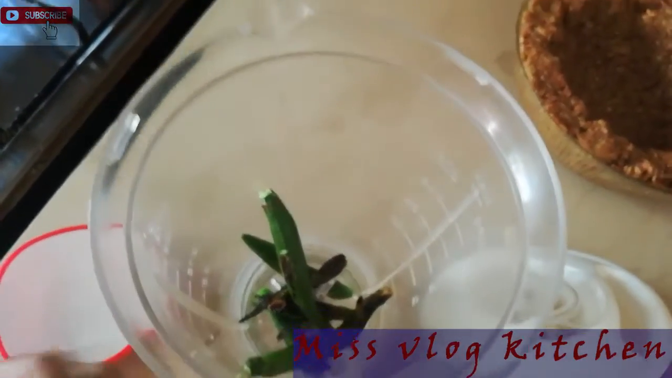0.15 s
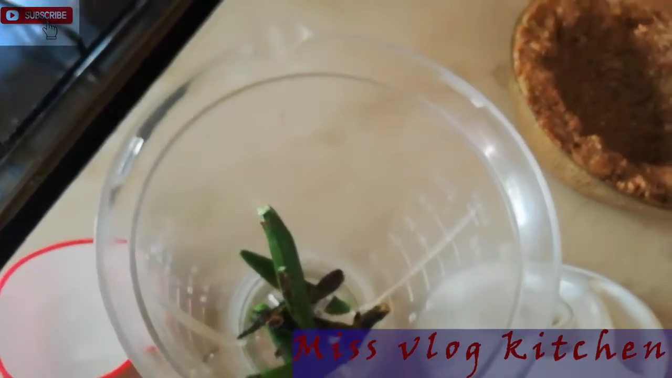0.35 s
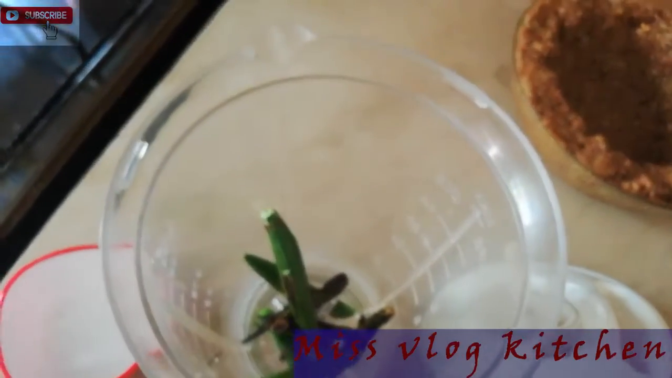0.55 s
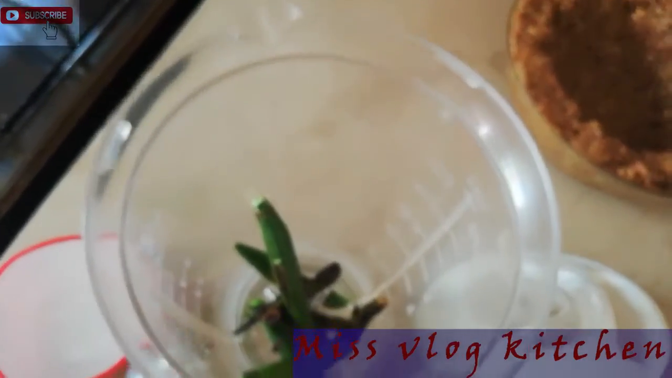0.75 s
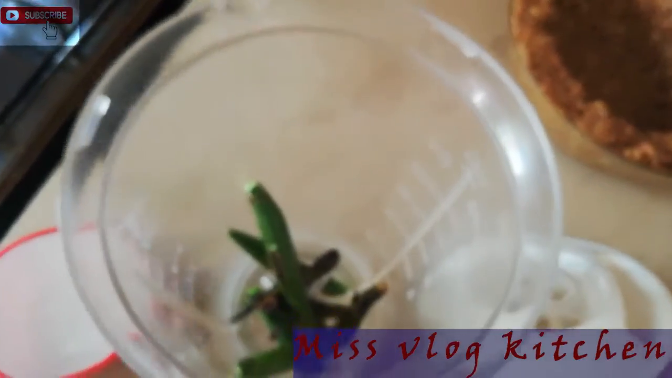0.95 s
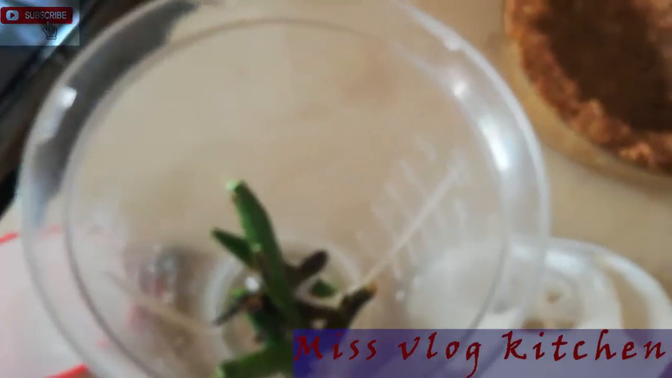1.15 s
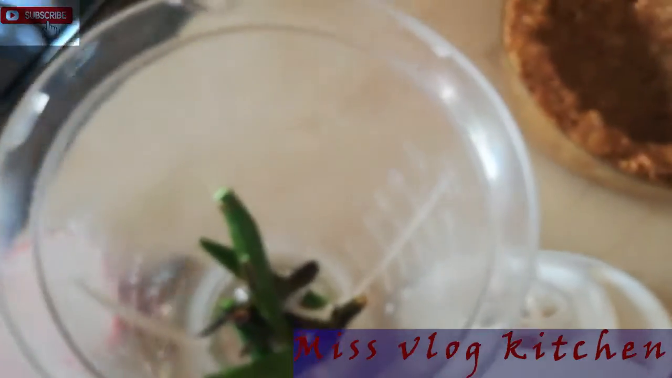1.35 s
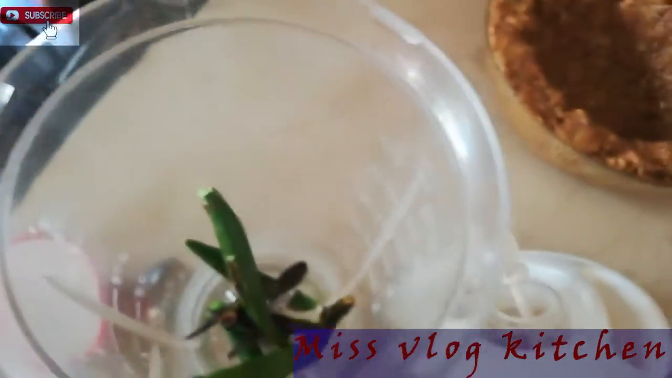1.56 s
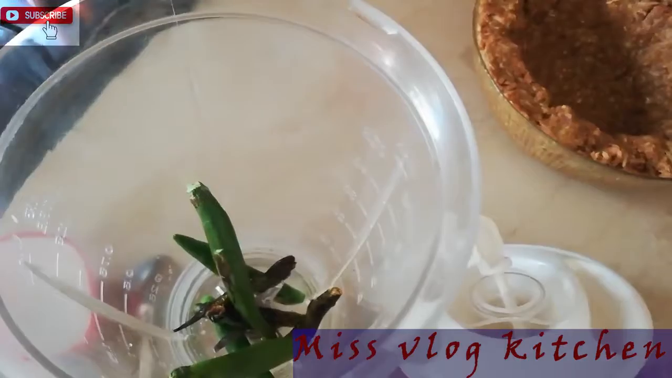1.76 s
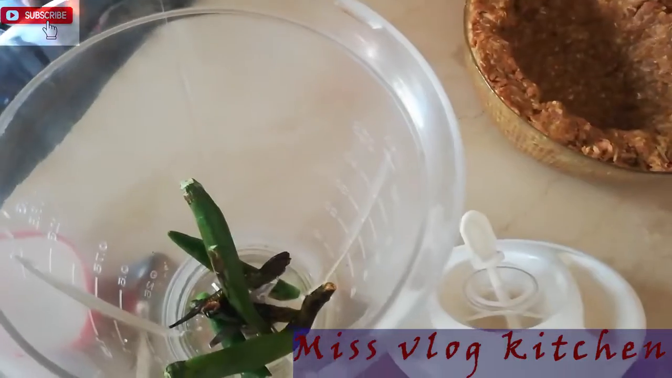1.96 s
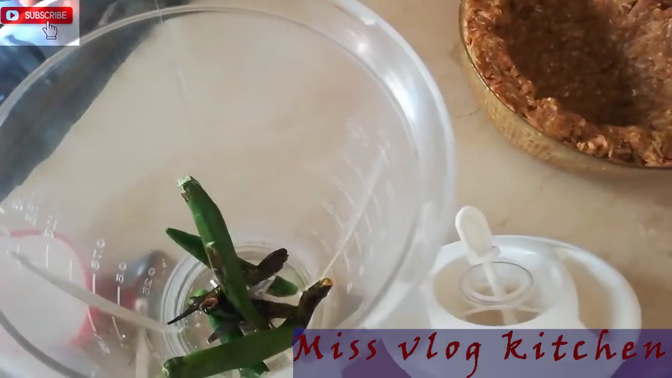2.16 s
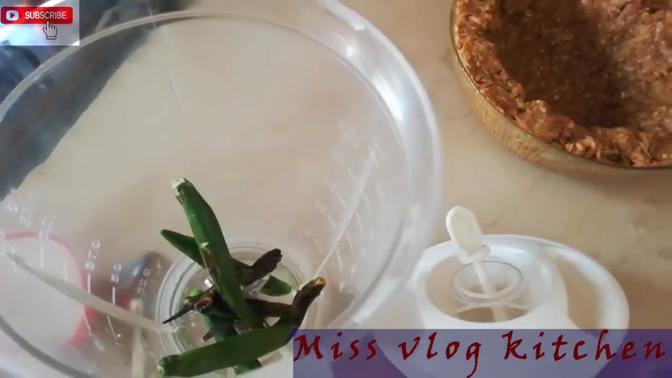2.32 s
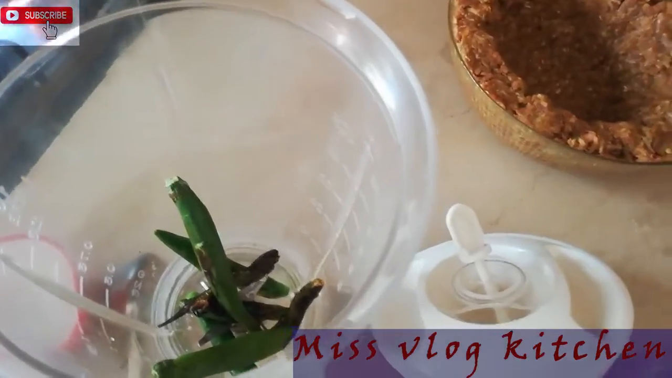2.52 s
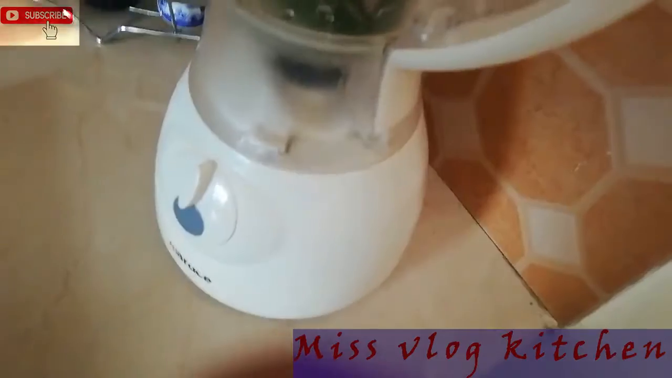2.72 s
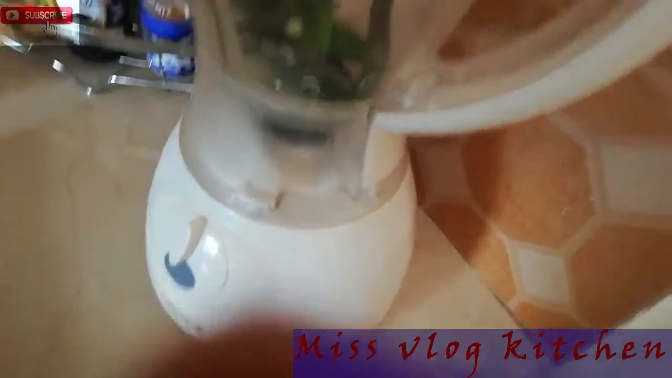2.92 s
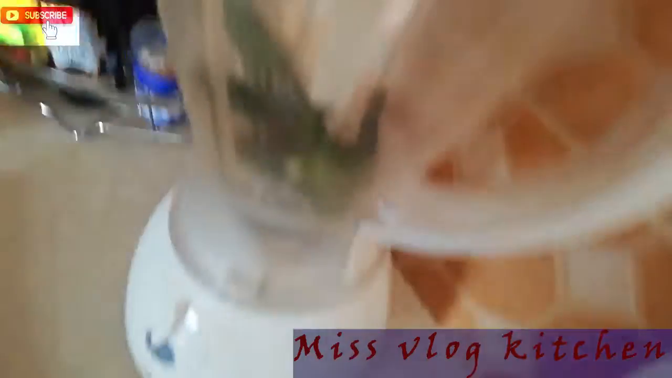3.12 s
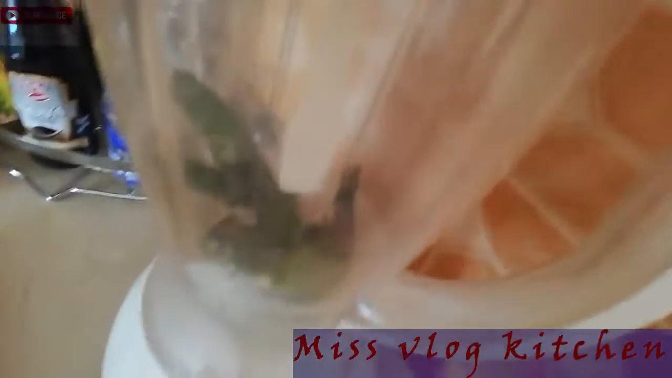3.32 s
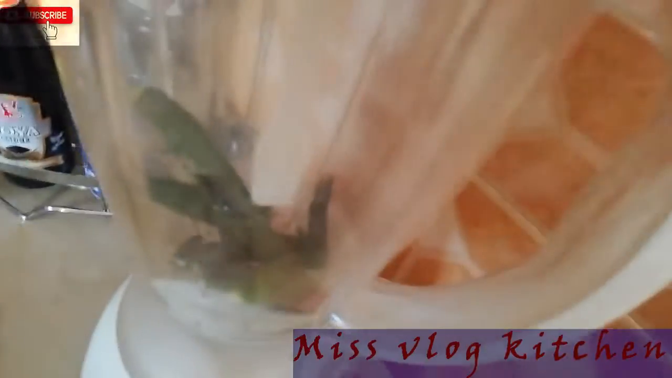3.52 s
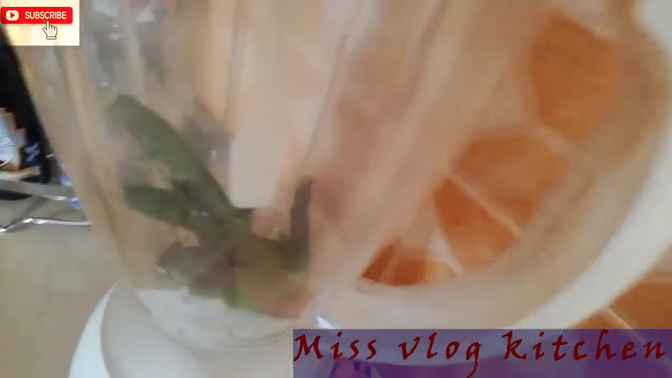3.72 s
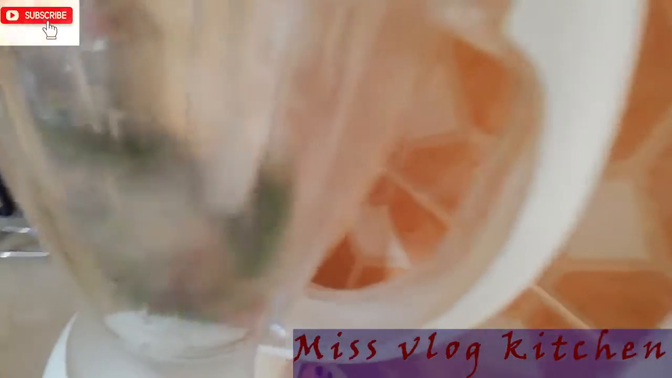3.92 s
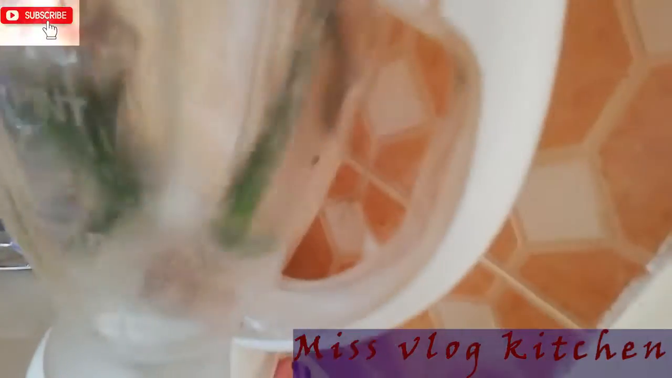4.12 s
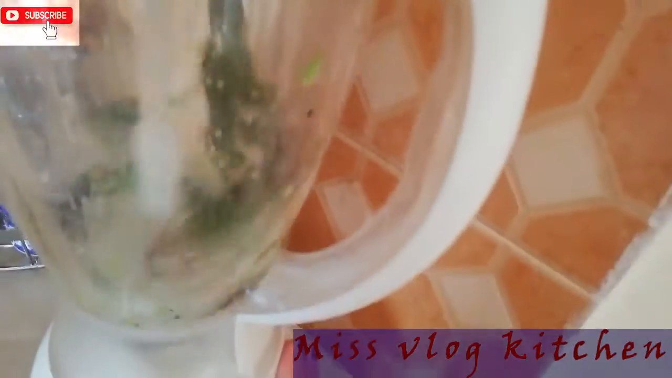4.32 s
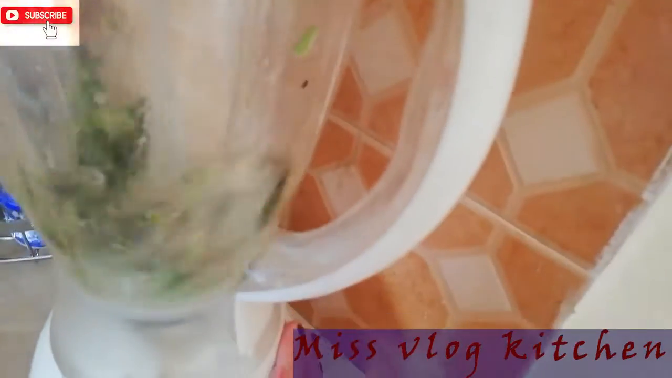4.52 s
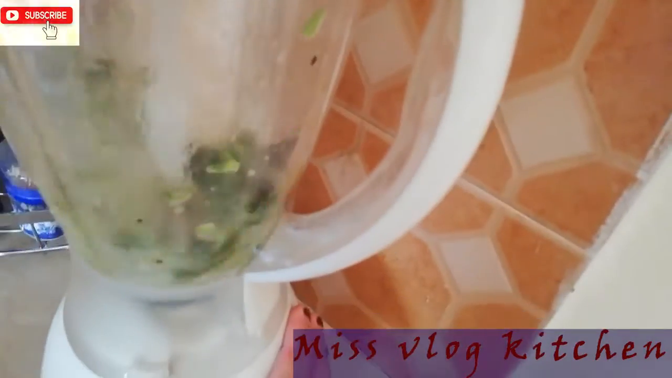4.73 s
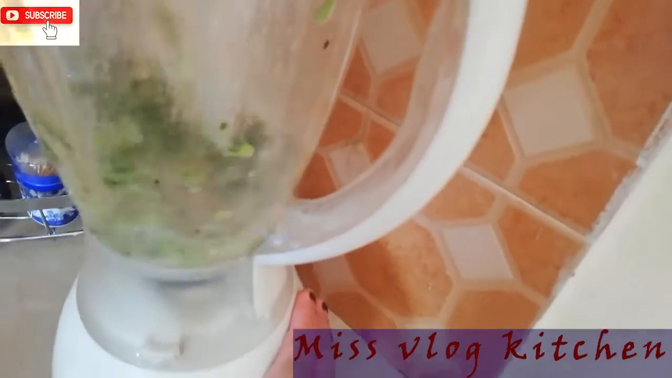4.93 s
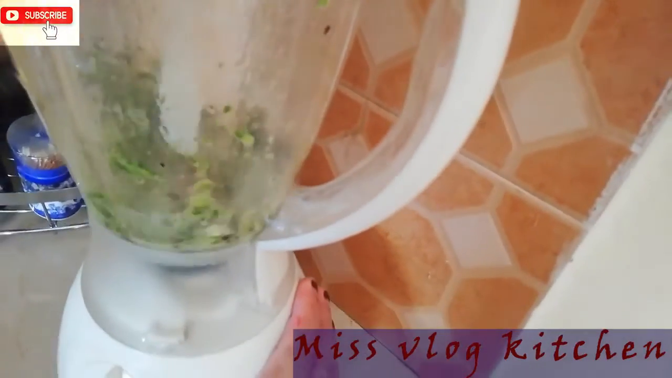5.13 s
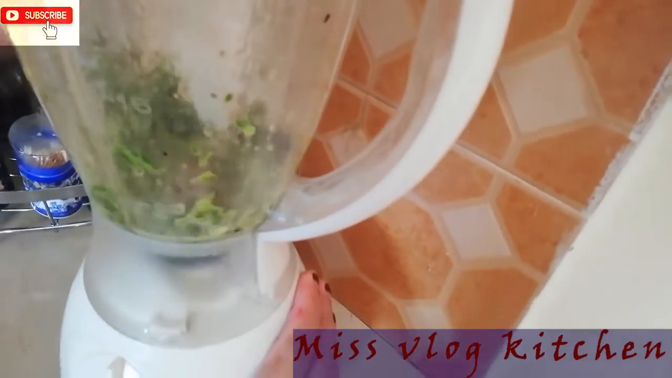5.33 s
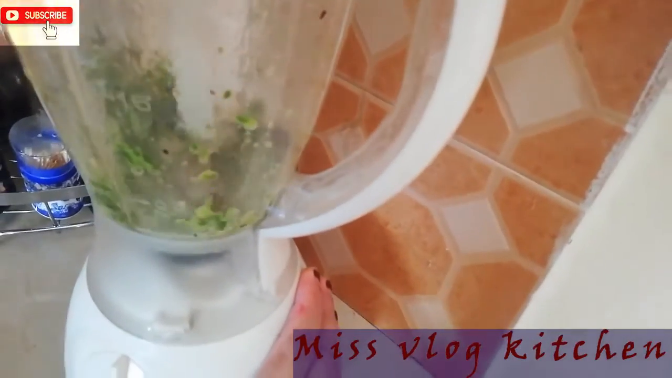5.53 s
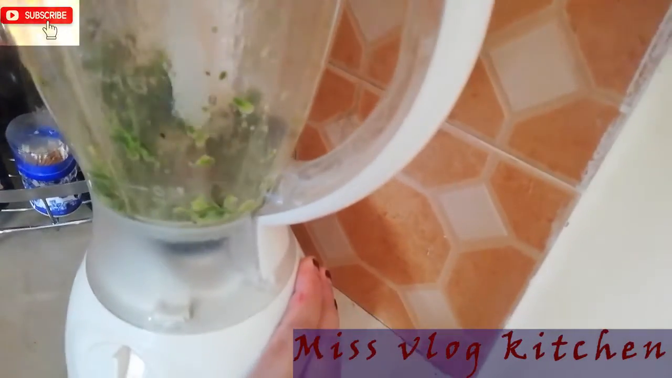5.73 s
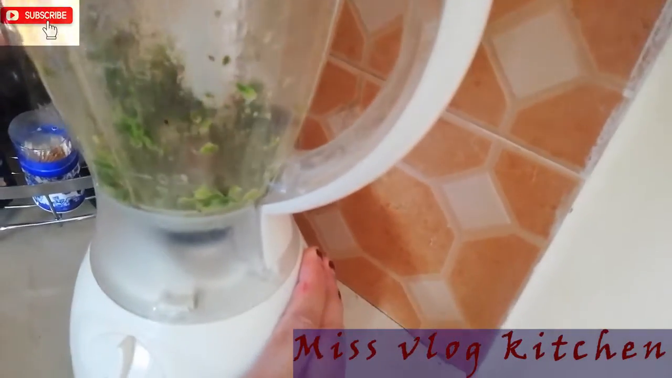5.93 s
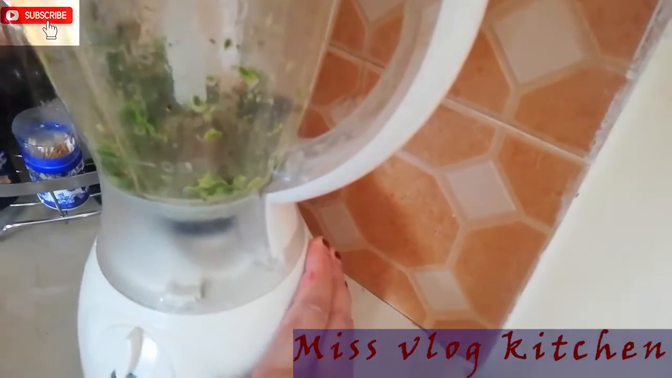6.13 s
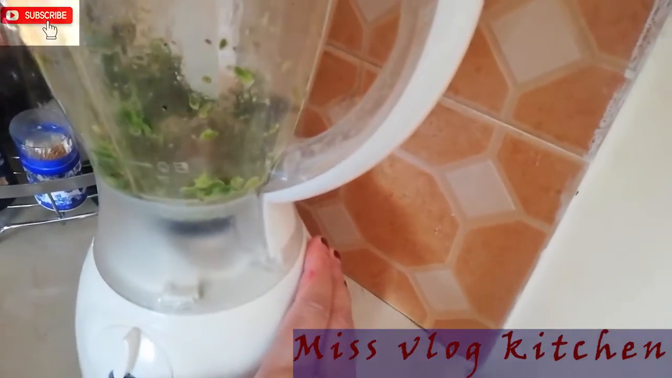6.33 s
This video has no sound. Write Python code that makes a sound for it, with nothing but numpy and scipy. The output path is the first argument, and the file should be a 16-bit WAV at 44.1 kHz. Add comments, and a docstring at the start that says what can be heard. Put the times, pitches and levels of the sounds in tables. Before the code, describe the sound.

Hands scuff a plastic jug and a small steel part taps and rattles, then a blender roars on, chopping lumpily before whining down.

```python
"""A blender starts close to the two ports of a phone, chops a few chillies in lumps, speeds up as they
clear and is switched off: shaft tones and whine, noise grains ringing the jug, and fan hiss.
Before it a knock dies away, hands scuff plastic and cloth (friction grains), and a small steel part is
tapped and slides rattling (decaying sines). Behind lies a quiet kitchen: shaped noise and mains hum."""
import sys
import numpy as np
from scipy import signal
from scipy.fft import rfft, irfft
from scipy.io import wavfile
from scipy.ndimage import uniform_filter1d

SR = 44100
rng = np.random.default_rng(int(sys.argv[2]) if len(sys.argv) > 2 else 0)


def boost(x):
    """Linear amplitude factor 10**(x/20) for a level x in decibels (scalar or array-like)."""
    u = np.asarray(x, float) / 20
    return 10 ** u


def master_out(mix):
    """Clip the mix to full scale and print it as 16-bit PCM to the path in sys.argv[1]."""
    frames = np.transpose(np.atleast_2d(mix))
    ceiling = np.clip(frames, -1, 1)
    pcm = np.round(ceiling * 32767).astype(np.int16)
    wavfile.write(sys.argv[1], SR, pcm)


N = 280917
T = np.arange(N) / SR  # s

# Levels in the tables are relative; the gains applied later set the final loudness.
POWER_ON = 3.92  # s
HUM_HZ = 100  # mains hum, in the room and in the motor windings


def blender():
    """The clean tones of the motor, and the noise of the jug that it drives."""
    turns, tones = motor()
    return tones, chopping(turns)


def shaft():
    """Load of big pieces 0-1, speed share while coasting, tone change in dB, share without current, gate."""
    power_off, mince_s, coast_s = 6.05, 0.47, 0.77  # s; the last two are time constants
    shake_db, free_db = -31, 4.5  # shaft tone change at full load, and once the current is off
    since_on, since_off = np.maximum(T - POWER_ON, 0), np.maximum(T - power_off, 0)
    load = np.exp(-since_on / mince_s)
    coast = np.exp(-since_off / coast_s)
    free = 1 - np.exp(-since_off / .05)
    on = np.clip((T - POWER_ON) / 0.0014, 0, 1)
    return load, coast, shake_db * load + free_db * free, free, on


def motor():
    """Shaft tone and orders, hum of the windings, commutator whine and a last squeak."""
    # motor under power, before coasting: time_s, shaft_turns_per_s, shaft_tone_db
    speeds = [(3.92, 120, -61), (4.15, 165, -46), (4.3, 200, -49), (4.41, 203, -32), (5.0, 208, -31),
              (5.1, 210, -30.5), (5.3, 215.5, -29), (5.8, 225, -30), (6.05, 226.5, -30)]
    # orders of the shaft: multiple, level_db
    order_levels = [(2, -12), (3, -7), (4, 0), (5, -3), (6, -2), (7, -9), (8, -7), (9, -7), (10, -8)]
    # commutator whine: multiple, level_db, width_hz
    bars = [(36, -38, 70), (48, -38, 50), (60, -49, 60)]
    # squeak as the shaft slows: start_s, end_s, pitch_hz, width_hz, level_db
    squeak = (6.23, 6.32, 3520, 60, -36)
    tone_power = 3.3  # shaft tone follows the coasting speed to this power
    winding_db, winding_load_db = -40, -21  # hum of the windings, and its change at full load

    load, coast, clear_db, free, on = shaft()
    hz, tone_db, _ = curve(speeds)
    hz = hz * coast
    wobble = evened(uniform_filter1d(rng.standard_normal(N), size=900))
    turns = np.cumsum(hz * (1 + .0015 * wobble)) / SR
    orders = np.zeros(N)
    for k, db in order_levels:
        housing_db = np.minimum(24 * np.log2(k * hz / 870), 0)  # radiates poorly under 870 Hz
        orders += boost(db + housing_db) * np.sin(2 * np.pi * (k * turns + rng.random()))
    tones = boost(tone_db) * coast ** tone_power * np.sin(2 * np.pi * turns)
    tones = tones + boost(clear_db - 35 + 2.5 * wobble) * orders
    whine = np.zeros(N)
    for k, db, width in bars:
        whine += boost(db + 2 * clear_db) * evened(resonate(rng.standard_normal(N), k * hz, width))
    winding = boost(winding_db + winding_load_db * load) * np.sin(2 * np.pi * HUM_HZ * T)
    powered = (1 - free) * (whine + winding)  # no current, no whine
    return turns, on * (tones + powered) + note(*squeak)


def chopping(turns):
    """Blade strikes ring the jug, pieces hit its wall, and the fan hisses; strikes and fan throb each turn."""
    # pieces jam the blades, then clear: peak_s, build_up_s, clearing_s, gain_db
    jams = [(3.929, 0.018, 0.023, 3.5), (4.039, 0.12, 0.016, 4.5), (4.17, 0.14, 0.037, 5),
            (4.234, 0.054, 0.015, 8.5), (4.38, 0.084, 0.013, 4), (4.46, 0.019, 0.017, 5),
            (4.511, 0.039, 0.029, 5), (4.59, .05, 0.091, 3.5), (4.685, 0.049, .025, 5.5),
            (4.765, 0.056, 0.018, 6), (4.835, 0.031, 0.11, 4), (5.021, 0.041, 0.058, 4.5),
            (5.43, 0.049, .02, 2.5)]
    # resonances of the jug: pitch_hz, width_hz, level_db
    jug_modes = [(905, 55, -9), (1007, 28, -8), (1565, 28, -2), (2020, 45, -2), (2130, 70, 0),
                 (2620, 45, -9), (2890, 140, -5), (3290, 140, -7), (3850, 140, -5), (4700, 100, -10)]
    # broad chopping roar: frequency_hz, level_db
    roar = [(150, -9.5), (250, -20), (287, -19.5), (606, -9), (695, -14), (913, -4.5), (1430, -8),
            (2070, -0.5), (2400, -6.5), (2910, -7), (6500, -18.5), (8450, -26), (14300, -120)]
    # fan hiss: frequency_hz, level_db
    fan_colour = [(2350, -60), (4000, -5), (5810, -2), (6450, -4.5), (7030, -4), (8020, 0.5), (8740, 0.5),
                  (10600, -3), (13000, -9.5), (15800, -22.5)]
    # pieces flung against the jug wall: start_s, level_db, t60_s
    chunks = [(3.979, -7, 0.092), (4.022, -24, 0.13), (4.1265, -5.5, 0.46), (4.2224, -20, 0.21),
              (4.4363, -4, 0.28), (4.4934, -11.5, 0.2), (4.5796, -10, 0.14), (4.67, -2.5, 0.14),
              (4.7499, -6, 0.11), (4.8232, -5.5, 0.15), (5.3995, -13, 0.21)]
    # jug wall under the flung pieces: frequency_hz, level_db
    wall = [(1500, -35), (2800, -8), (3250, -2), (3550, 2), (3850, 8), (4300, -1), (4800, 5.5), (6000, -4),
            (15000, -22)]
    chop_db, chop_load_db, fan_db, fan_load_db = -21.5, -3.5, -27.5, -8  # levels, changes at full load
    ring_empty_db, ring_load_db = -10, 10  # the jug rings more while big pieces are in it
    chop_power, fan_power = 0.66, 0.41  # levels follow the coasting speed to these powers

    load, coast, _, _, on = shaft()
    heavy = np.sqrt(load)
    jam_db = np.zeros(N)
    for s, rise, clearing, db in jams:
        jam_db += db * np.clip(np.minimum(1 + (T - s) / rise, 1 - (T - s) / clearing), 0, 1)
    jam = boost(jam_db)
    throb = 1 + 0.087 * np.cos(2 * np.pi * turns)
    lumps = evened(uniform_filter1d(uniform_filter1d(rng.standard_normal(N), size=300), size=300))
    lumpy = throb * boost((.5 + 2.2 * load) * lumps)  # big pieces meet the blades unevenly

    strikes = grains(4500, 2.2) * lumpy
    jug = np.zeros(N)
    for k, (hz, width, db) in enumerate(jug_modes):
        jug += (-1) ** k * boost(db) * evened(resonate(strikes, hz, width))
    chop = boost(ring_empty_db + ring_load_db * heavy) * evened(jug)
    chop = chop + boost(-1.5) * colour(grains(6000, 2.2) * lumpy, roar)
    chop = boost(chop_db + chop_load_db * heavy) * coast ** chop_power * chop

    flung = np.zeros(N)
    for s, db, t60 in chunks:
        t = np.maximum(T - s, 0)
        flung += (T > s) * boost(db - 14.0 - 60 * t / t60) * (1 - np.exp(-t / 0.0038))
    fan = colour(grains(12000, 0.93) * throb, fan_colour)
    fan = boost(fan_db + fan_load_db * load) * coast ** fan_power * fan
    return on * (jam * chop + jam ** 0.78 * fan) + flung * colour(grains(3000, 3), wall)


def steel():
    """Each tap cracks, stops the last ring and starts its own; bounces and tiny taps of sliding ring briefly."""
    # modes of the steel part, t60 before the grip: pitch_hz, level_db, t60_s
    modes = [(2600, -24, .1), (3165, -15, .2), (3348, -13, .2), (3600, -20, .1), (4592, -3, .3),
             (5760, -10, .3), (7267, -5, .4), (7671, -10, .2), (8915, 0, .28), (9415, -10, .2),
             (9738, -13, .2), (10510, 0, .25), (12380, -14, .2), (13100, -10, .2), (13390, -7, .18),
             (13710, -9, .2)]
    # taps: start_s, level_db, freedom to ring (share of t60), dullness_db_per_octave
    taps = [(1, -6, 0.2, 5), (1.02, -18, 0.6, 10.5), (1.2418, -4, 0.66, -1), (1.2572, -4, 1.2, 0),
            (1.304, -8.5, 1, -4), (1.33, -5, 0.8, -3.5), (1.348, -13, 0.6, 1), (1.365, -18, 0.6, 3),
            (1.388, -12, 0.9, -5), (1.4767, -21.5, 1.2, -5), (1.607, -27, 0.4, 9)]
    # pressure of the sliding part: time_s, level_db
    pressure = [(1.22, -56), (1.228, -40), (1.241, -36), (1.244, -20), (1.29, -22.5), (1.34, -21.5),
                (1.5, -26.5), (1.55, -33.5), (1.62, -56)]
    # steel on stone: frequency_hz, level_db
    scratch = [(1500, -22), (3400, 4), (6300, -6), (9500, 5.5), (13500, -29), (15200, -33)]
    # the part bounces as it slides: start_s, end_s, bounces_per_s, unevenness (share), level_db
    bouncing = (1.335, 1.4229, 85, 0, -39.5)

    out, t = np.zeros(N), T[:SR // 2]
    octaves = np.log2(np.transpose(modes)[0] / 5000)
    ends = [row[0] for row in taps[1:]] + [T[-1]]
    tap_shares = rng.uniform(.55, 1, (len(taps), len(modes)))  # each tap excites the modes differently
    for (s, db, free, dull), end, shares in zip(taps, ends, tap_shares):
        dulled = [(f, g - dull * np.log2(f / 5000)) for f, g in scratch]
        crack = colour(rng.standard_normal(2000), dulled)
        until = np.exp(-np.maximum(t - end + s, 0) / .004)  # the next tap stops this ring
        tone = ring(modes, shares * boost(-dull * octaves), np.clip(free, .1, 1.5))
        add(out, s, boost(db - 5) * until * tone)
        add(out, s, boost(db - 9.5 - 60 * t[:2000] / .012) * crack)

    db, on = curve(pressure)
    drive = on * boost(db)
    bounces, dry_clicks = chatter(*bouncing)
    for hz, mode_db, t60 in modes:
        mode = boost(-60 * t / (.13 * t60)) * np.sin(2 * np.pi * hz * t)  # sliding damps the ring
        blows = grains(200, 0.87) + boost(26) * bounces * rng.standard_normal(N)
        out += boost(mode_db - 8.5) * signal.oaconvolve(drive * blows, mode / np.linalg.norm(mode))[:N]
    grit = colour(grains(900, 1.7), scratch)
    return out + boost(-15) * drive * grit + dry_clicks


def chatter(start, end, per_s, uneven, db):
    """Quick, nearly even bounces, and their dry clicks around the lowest modes."""
    drift = evened(uniform_filter1d(rng.standard_normal(N), size=600))
    count = np.cumsum(per_s * (1 + uneven * drift)) / SR
    bounce = np.diff(np.floor(count), prepend=0) > 0
    clicks = bounce * rng.uniform(0.58, 1, N) * (T > start) * (T < end)
    click = rng.standard_normal(300) * boost(-60 * T[:300] / .006)
    dry_clicks = signal.oaconvolve(clicks, click)[:N]
    dry_clicks = resonate(resonate(dry_clicks, 3700, 2100), 3700, 2100)
    # the level holds over the bounces rather than over the whole scene
    return clicks, boost(db) * evened(dry_clicks) * np.sqrt((end - start) * SR / N)


def hands():
    """Fine friction grains in three colours under the strokes; each slip rings its own part of the plastic."""
    # fine hiss of rubbing: frequency_hz, level_db
    hiss_colour = [(2650, -18), (4500, -9), (5710, -5.5), (6460, -3.5), (8330, 0.5), (9480, 0),
                   (12200, -11.5), (15500, -25)]
    # body of the rubbed plastic: frequency_hz, level_db
    body_colour = [(1800, -14), (2200, -8), (2500, 2), (2850, -8), (3350, -3), (4100, -9), (4950, -1),
                   (5700, -9), (6500, -16)]
    # scrape of the dragged jug: frequency_hz, level_db
    scrape_colour = [(650, -7), (900, 1), (1080, -5), (1330, 3.5), (1520, -3), (1750, 3), (2300, -7.5),
                     (3300, -38)]
    # hands rubbing plastic and cloth: start_s, length_s, hiss_db, change_by_end_db, body_relative_db
    strokes = [(0.345, 0.091, -48, -3, 10.5), (0.419, 0.22, -40.5, -13, 4.5),
               (0.641, 0.11, -41.5, -8.5, -5.5), (0.759, 0.22, -49.5, -3, -3.5), (1.028, 0.23, -45, -15, 1),
               (1.573, 0.12, -45, -18, -2.5), (1.77, 0.12, -62, 7.5, -6.5), (1.903, 0.2, -53, -18, -8),
               (2.048, 0.18, -50, -17, -18), (2.343, 0.085, -61.5, 15, -14), (2.427, 0.13, -45.5, -12, -15),
               (2.83, 0.18, -65.5, 8, 1), (3.087, 0.2, -50.5, -3.5, 2), (3.29, 0.098, -47, 3.5, -0.5),
               (3.394, 0.23, -42.5, -11.5, 2), (3.623, 0.41, -45, -1.5, -0.5)]
    # the jug dragged a little: start_s, length_s, level_db, change_by_end_db
    drags = [(0.407, 0.16, -42, -18), (0.705, 0.26, -46, -5.5), (1.027, 0.21, -58.5, -6),
             (1.81, 0.25, -57.5, -3), (2.6, 0.474, -68, 10), (3.105, 0.25, -55.5, -1.5),
             (3.32, 0.94, -50.5, -3.5)]
    # sudden slips of the grip: start_s, level_db, body_relative_db, t60_s, body_hz
    slips = [(.35, -32.5, 1.5, 0.15, 2500), (.4174, -22.5, -8, 0.11, 2520), (.627, -24.5, -14, 0.25, 5000),
             (1.897, -33.5, -28, 0.36, 5500), (2.5416, -36.5, -22, 0.12, 5500),
             (2.953, -33.5, -1.5, 0.13, 3040), (3.106, -48, 18.5, 0.31, 5530),
             (3.3675, -23, -1, 0.12, 5730), (3.4241, -31, 1.5, 0.16, 3600), (3.5458, -30, -20, 0.054, 4500),
             (3.6965, -41, 10, 0.69, 3070)]

    hiss, scrape = (colour(grains(9000, 2.2), points) for points in (hiss_colour, scrape_colour))
    body = colour(grains(3000, 3.5), body_colour)  # coarser
    out = scrape * sum(stroke(*row) for row in drags)
    rub = grains(9700, 3.3)[:SR]
    for s, length, db, change_db, body_db in strokes:
        out = out + stroke(s, length, db, change_db) * (hiss + boost(body_db) * body)
    t = T[:SR // 2]
    for k, (s, db, body_db, t60, hz) in enumerate(slips):
        part = slice(k * 1500, k * 1500 + SR // 2)  # each slip reads the grains from a point 1500 samples further on
        spot = evened(resonate(resonate(rub[part], hz, .4 * hz), hz, .4 * hz))
        envelope = boost(db - 6.5 - 60 * t / t60) * (1 - np.exp(-t / 0.0015))
        add(out, s, envelope * (hiss[part] + boost(body_db) * spot))
    return out


def stroke(start, length, db, change_db):
    """Envelope of one stroke: soft edges, level sliding evenly in dB."""
    edge_s = 0.018
    u = T - start
    edges = np.clip(np.minimum(u, length + edge_s - u) / edge_s, 0, 1)
    return edges * boost(db + change_db * np.clip(u / length, 0, 1))


def knocks():
    """Blows on plastic ring its modes; jolts carried by the counter are single decaying sines."""
    # modes of the knocked plastic: pitch_hz, level_db, t60_s
    modes = [(640, -13, .012), (950, -10, .015), (1200, -10, .02), (1450, -3, .028), (1735, 0, .024),
             (2940, -6, .022), (3640, -10, .015), (5250, -12, .008)]
    # blows: start_s, level_db, brightness_db_per_octave
    blows = [(0.0, -30, -1), (0.0098, -20, 2), (0.904, -32, 9), (0.912, -41, -7), (1.263, -31.5, 5),
             (1.35, -32, -6), (3.925, -19.5, 9)]
    # dull jolts through the counter: start_s, level_db, pitch_hz, t60_s
    jolts = [(0.008, -33.5, 204, 0.38), (1.262, -32, 48, 0.064), (1.264, -33.5, 207, 0.078),
             (1.352, -39, 48, .08), (3.651, -50.5, 259, 0.57), (3.922, -12, 419, 0.025),
             (3.937, -10.5, 155, 0.037), (4.101, -16.5, 153, 0.039), (5.868, -26, 109.4, 0.085)]

    out, t = np.zeros(N), T[:SR // 4]
    hz = np.transpose(modes)[0]
    signs = (-1.) ** np.arange(len(hz))
    for s, db, bright in blows:
        add(out, s, boost(db + 5.0) * ring(modes, signs * boost(bright * np.log2(hz / 1700))))
    for s, db, jolt_hz, t60 in jolts:
        envelope = boost(db - 60 * t / t60) * (1 - np.exp(-t / 0.0018))
        add(out, s, envelope * np.sin(2 * np.pi * jolt_hz * t))
    return out


def kitchen():
    """Room air as shaped noise with a low drone and a faint tone, and a wavering mains hum."""
    # room air: frequency_hz, level_db
    air_colour = [(18, -37), (30, -9), (69, -12.5), (105, -14.5), (182, -17.5), (270, -15), (389, -15),
                  (467, -24), (921, -20.5), (2020, -24), (5740, -36.5), (8500, -31.5), (15500, -49)]
    # a second low tone: start_s, end_s, pitch_hz, width_hz, level_db
    drone = (2.58, 3.95, 149, 1.5, -55)
    # a faint wavering tone: start_s, end_s, pitch_hz, width_hz, level_db
    faint = (2.65, 2.95, 1350, 25, -60)
    air_db, hum_db, waver_db = -53, -52, 3.5  # the last is how much the hum wavers (rms)

    waver = evened(uniform_filter1d(uniform_filter1d(rng.standard_normal(N), size=4000), size=4000))
    hum = boost(hum_db + waver_db * waver) * np.sin(2 * np.pi * HUM_HZ * T)
    air = boost(air_db) * colour(rng.standard_normal(N), air_colour)
    return air + note(*drone) + note(*faint), hum


def suppress(air, hum, loud):
    """Turns the steady background down while the handling is loud, the hum twice as far in dB."""
    from_db, slope, back_db_per_s = -32.5, 0.42, 93  # threshold, dB per dB above it, fall of held level
    power_db = 10 * np.log10(abs(uniform_filter1d(loud ** 2, size=600)) + 1e-12)
    fall = back_db_per_s * T
    held_db = np.maximum.accumulate(power_db + fall) - fall  # jumps up at once, falls back evenly
    over_db = slope * np.maximum(held_db - from_db, 0)
    return air / boost(.5 * over_db) + hum / boost(over_db)


def evened(x):
    """Scales to rms 1."""
    return x / np.sqrt(np.mean(x ** 2) + 1e-20)


def read(points, hz):
    """Reads a spectrum table on a log frequency axis."""
    f, value = np.transpose(points)
    return np.interp(np.log(hz + 1), np.log(f + 1), value)


def curve(rows):
    """Columns of a time table at every sample, and a gate that is 1 inside it."""
    s, *columns = np.transpose(rows)
    gate = uniform_filter1d(1. * ((T > s[0]) & (T < s[-1])), size=60)
    return [np.interp(T, s, c) for c in columns] + [gate]


def colour(x, points):
    """Filters by a spectrum table, silent outside it, and evens the level."""
    hz = np.fft.rfftfreq(len(x), 1 / SR)
    inside = (hz >= points[0][0]) & (hz <= points[-1][0])
    return evened(irfft(rfft(x) * boost(read(points, hz)) * inside, len(x)))


def grains(per_s, spread_db):
    """Sparse clicks of random sign, a few of them large."""
    when, sign, size = rng.random((3, N))
    return evened((when < per_s / SR) * np.sign(sign - .5) * boost(-spread_db * np.log(size + 0.0093)))


def resonate(x, hz, width):
    """Shifts the curve hz down to zero, smooths, and shifts back: a resonance of gain 1."""
    turn = np.exp(2j * np.pi * np.cumsum(hz * np.ones(len(x))) / SR)
    r = np.exp(-np.pi * width / SR)
    return 2 * (turn * signal.lfilter([1 - r], [1, -r], x / turn)).real


def note(start, end, hz, width, db):
    """A fuzzy tone between two moments: noise through a narrow resonance."""
    on = uniform_filter1d(1. * ((T > start) & (T < end)), size=600)
    return on * boost(db) * evened(resonate(rng.standard_normal(N), hz, width))


def ring(modes, shares, free=1):
    """Decaying sines of a struck object, peak 1; a grip (free below 1) shortens them."""
    hz, db, t60 = np.transpose(modes)[:, :, None]
    t = T[:SR // 2]
    x = (shares[:, None] * boost(db - 60 * t / (free * t60)) * np.sin(2 * np.pi * hz * t)).sum(0)
    return x / abs(x).max()


def add(mix, s, sound):
    """Mixes a sound in at time s."""
    part = mix[round(s * SR):][:len(sound)]
    part += sound[:len(part)]


def room(x, t60, size):
    """Reverberates by convolving with a decaying noise tail of energy 1."""
    tail = rng.standard_normal(size) * boost(-60 * T[:size] / t60)
    return signal.oaconvolve(x, tail / np.linalg.norm(tail))[:N]


def ports(x, left_db, least, size=256):
    """Right hears the sound straight; left a turned share of it plus a diffuse share of random phase."""
    # likeness of the two ports: frequency_hz, likeness (0-1)
    likeness = [(180, 1), (350, .85), (600, .4), (1400, .5), (2500, .35), (5500, .25), (6600, .72),
                (9000, .76), (14000, .8)]
    # phase by which left leads: frequency_hz, lead_radians
    lead = [(20, 0), (60, -.22), (170, -.63), (340, -1.3), (520, -2.1), (690, -3.7), (1030, -6.3),
            (1380, -6.1), (2070, -7.9), (3100, -12.5), (4100, -14.5), (5900, -14.5), (6300, -4 * np.pi),
            (16000, -4 * np.pi)]
    # level of left minus right: frequency_hz, difference_db
    left_tilt = [(110, -0.5), (200, 5.5), (380, 0.5), (700, -4), (1290, -2), (2380, -5.5), (4400, -1),
                 (8120, -1), (15000, -9.5)]

    hop = size // 4
    hz, _, z = signal.stft(x, SR, nperseg=size, noverlap=size - hop)
    a, b = rng.standard_normal((2, *z.shape))
    smooth = np.sqrt(abs(uniform_filter1d(abs(z) ** 2, size=3, axis=1)))
    diffuse = smooth * (a + 1j * b) * boost(3.5)
    same = np.clip(read(likeness, hz), least, 1)[:, None]
    left = same * np.exp(1j * read(lead, hz))[:, None] * z + np.sqrt(1 - same ** 2) * diffuse
    left = left * boost(-1.44)
    tilt = boost(.5 * read(left_tilt, hz) + .5 * left_db)[:, None]  # shared between the two ports
    both = np.array([left * tilt, z / tilt])
    return boost(3.0) * signal.istft(both, nperseg=size, noverlap=size - hop)[1][:, :N]


def scene():
    """Blows get the small tiled room; the steel lies far to the right."""
    blows, part, rubbing = knocks(), steel(), hands()
    tones, noise = blender()
    handling = (T < POWER_ON) * (rubbing + part + blows)
    back = suppress(*kitchen(), handling)
    near = back + rubbing + blows + boost(-3.0) * room(blows, 0.35, size=16000)
    far = part + boost(-12) * room(part, .25, size=11000)
    steady = ports(noise, -1.1, .05, size=1024) + ports(tones, -0.83, least=0.98)
    return ports(near, -0.4, .05) + steady + ports(far, -6.5, least=.7)


def roll_off(x):
    """The treble ends steeply here."""
    return signal.sosfilt(signal.butter(12, 16330, fs=SR, output="sos"), x)


def record(dry):
    """The microphones cut the lows, the input saturates softly, and the treble is band-limited."""
    low_hz, top_hz, headroom = 45, 15800, 1.15  # headroom: height at which the input saturates
    dry = signal.lfilter(*signal.butter(2, low_hz, "high", fs=SR), dry)
    dry = headroom * np.tanh(dry / headroom)
    edge = signal.firwin(255, top_hz, window=("kaiser", 8), fs=SR)
    mix = signal.oaconvolve(dry, edge[None], "same")
    return roll_off(mix)


dry = scene()
out = record(dry)
master_out(out)
```